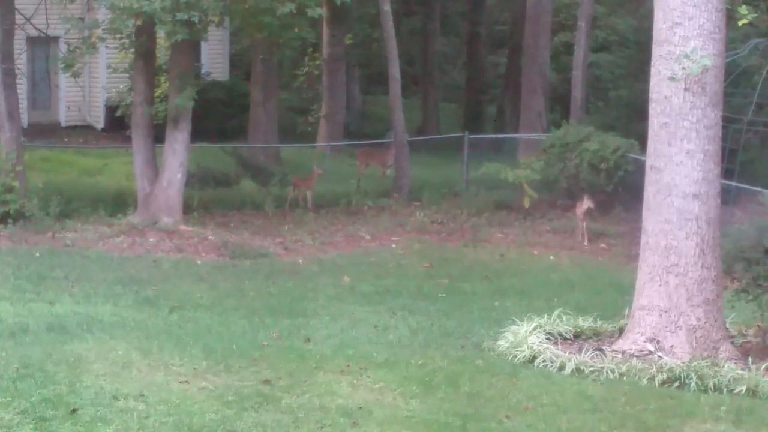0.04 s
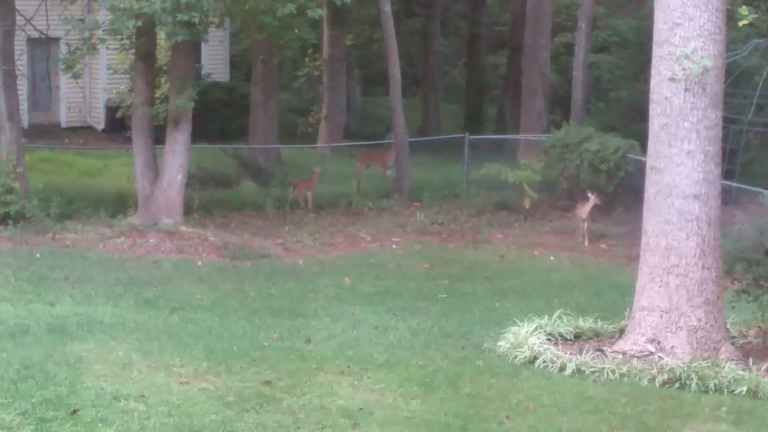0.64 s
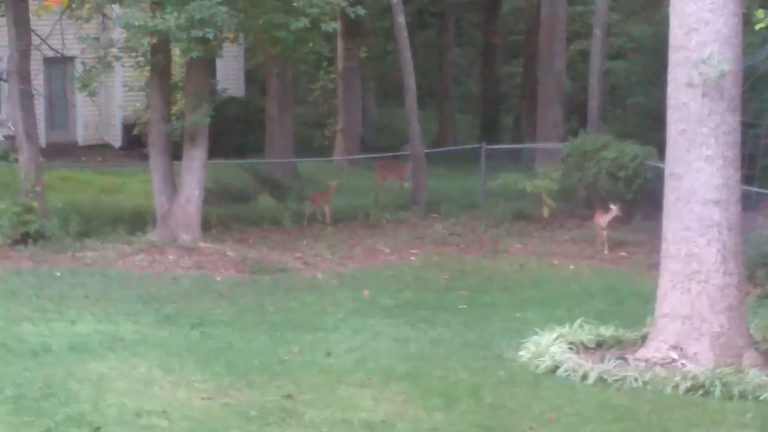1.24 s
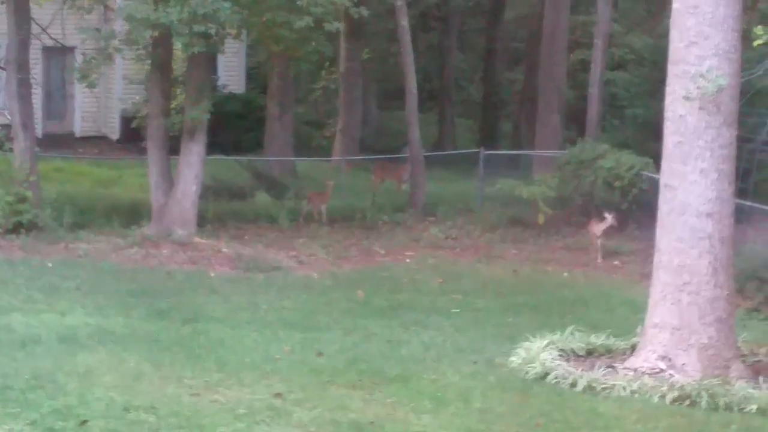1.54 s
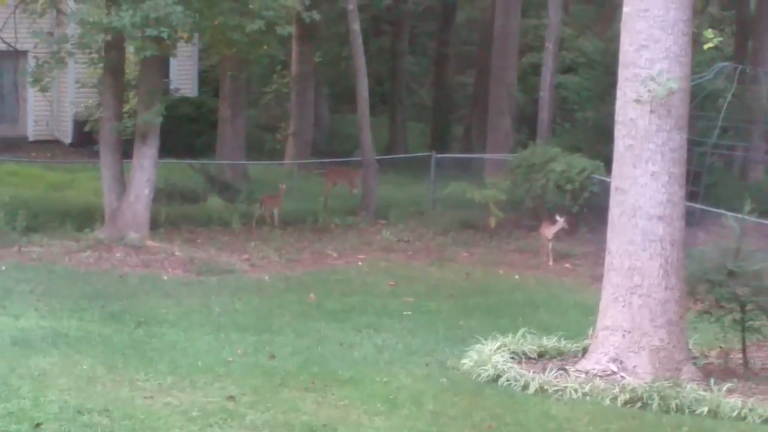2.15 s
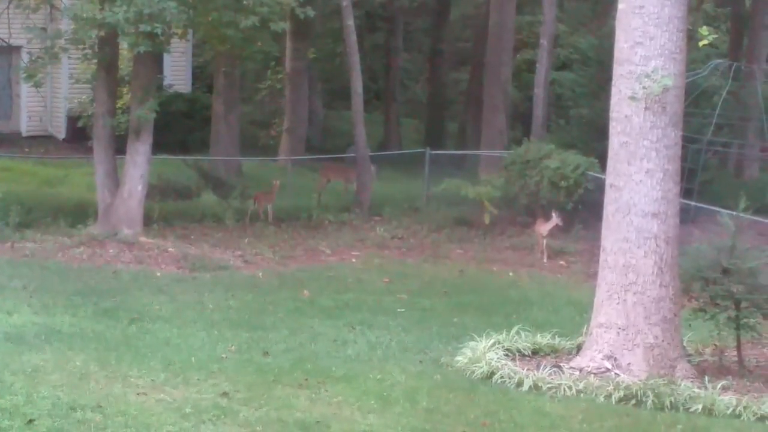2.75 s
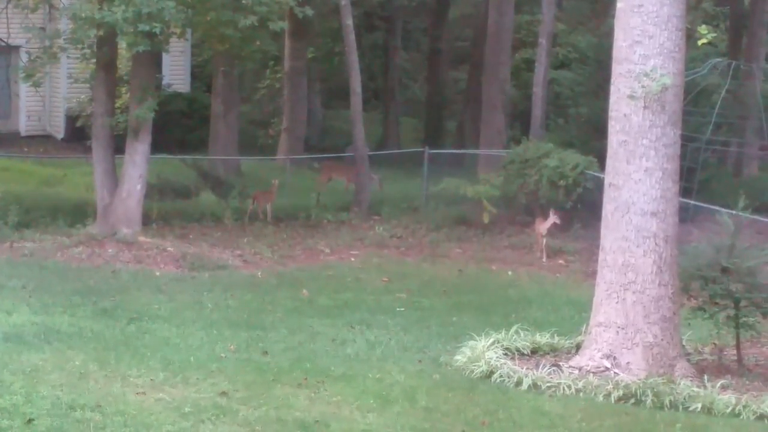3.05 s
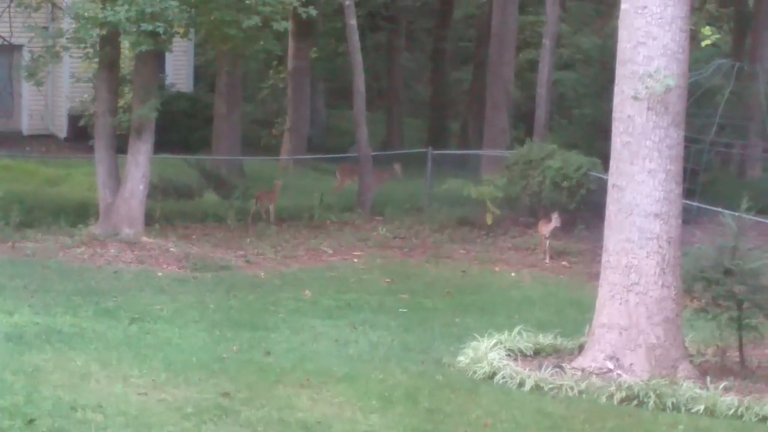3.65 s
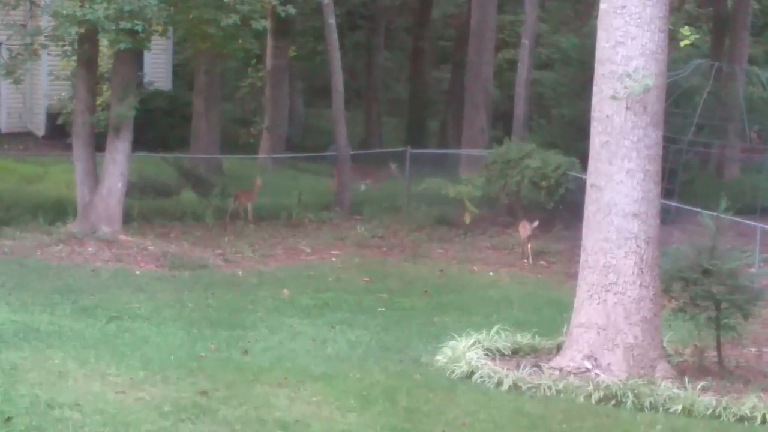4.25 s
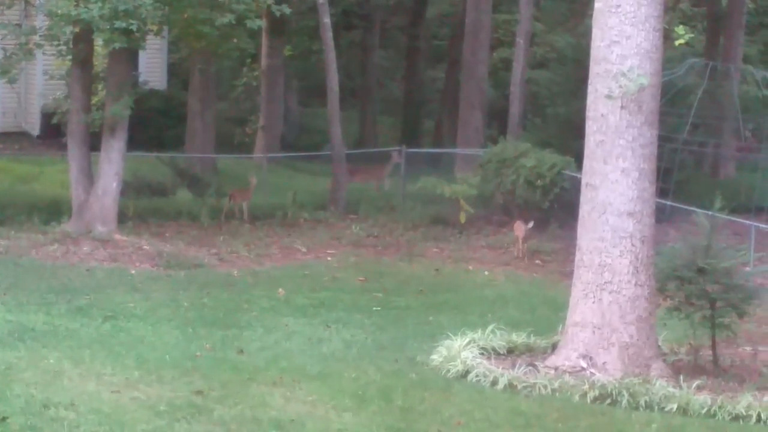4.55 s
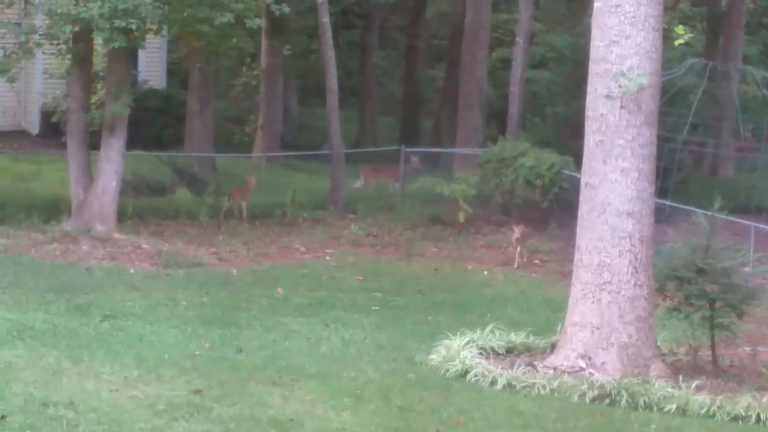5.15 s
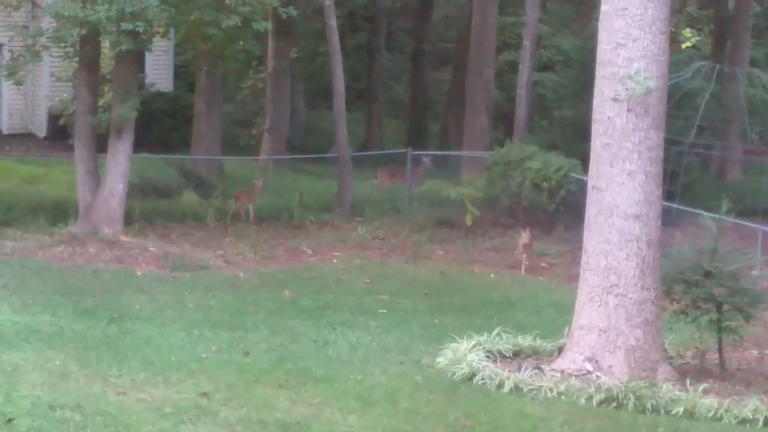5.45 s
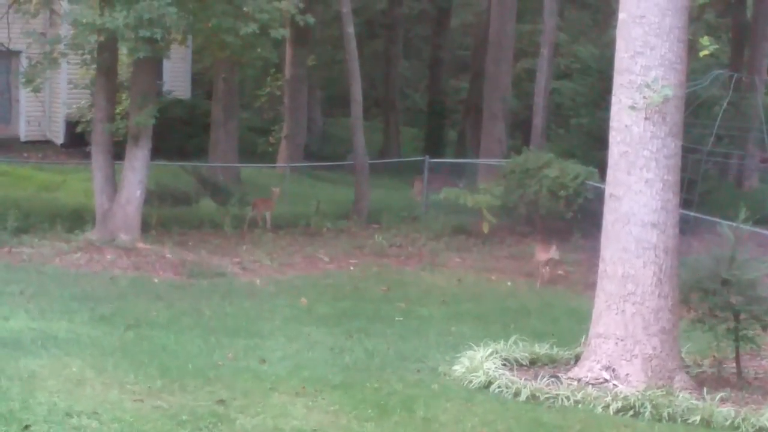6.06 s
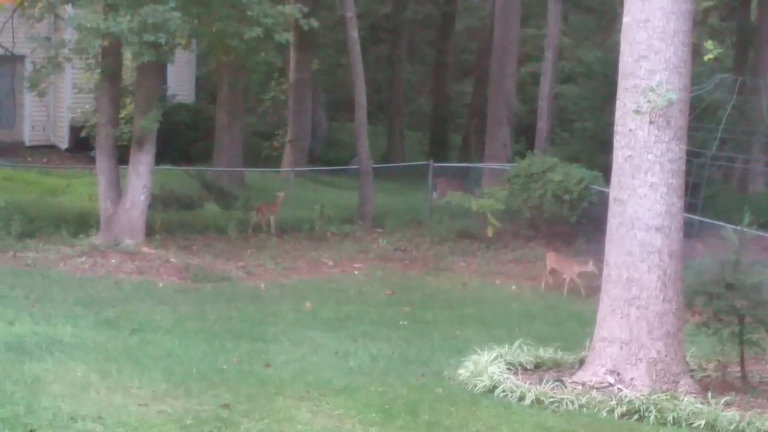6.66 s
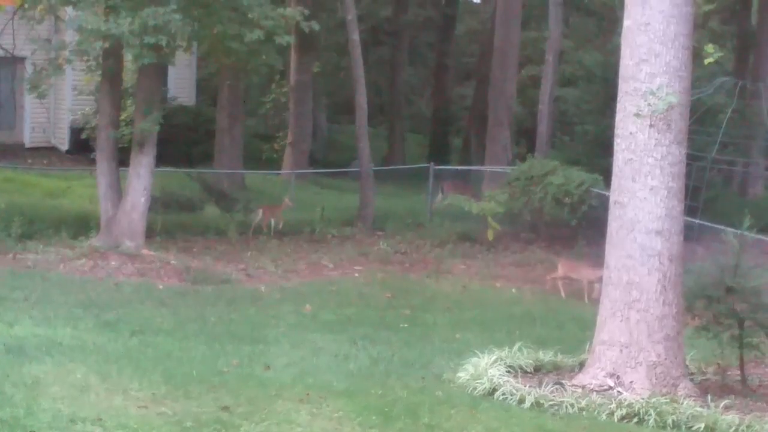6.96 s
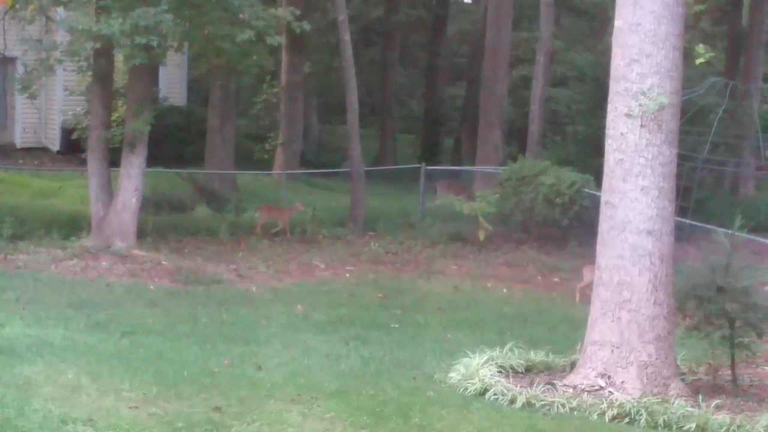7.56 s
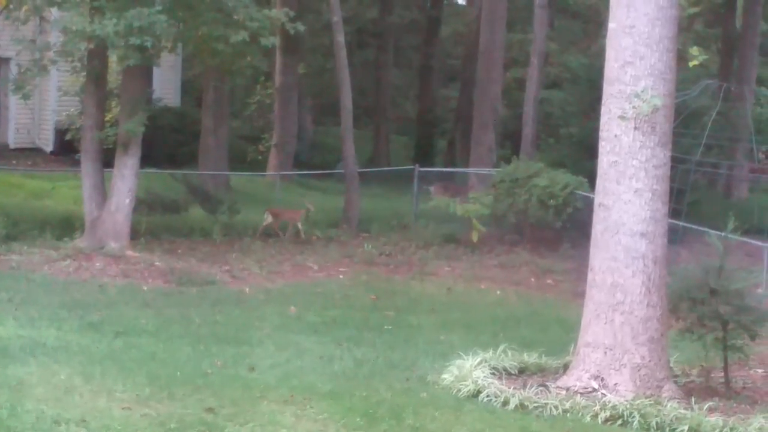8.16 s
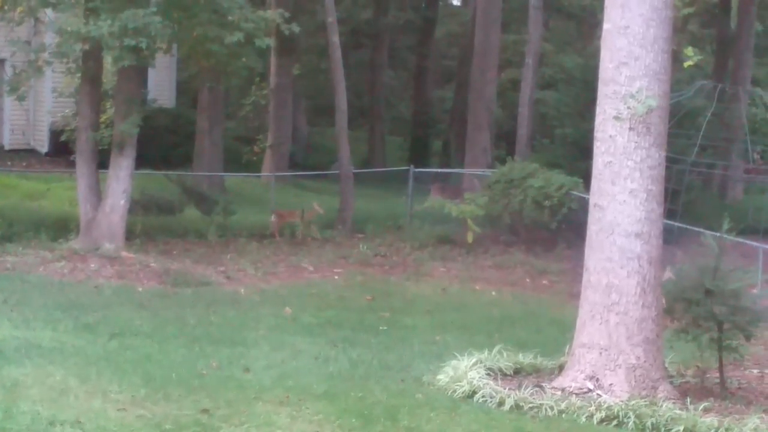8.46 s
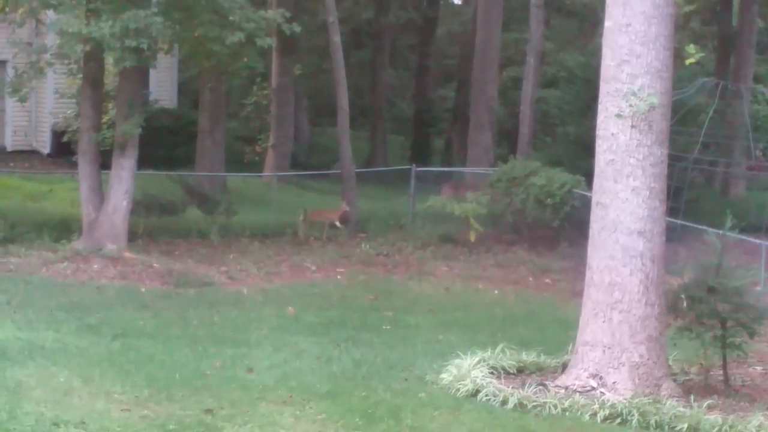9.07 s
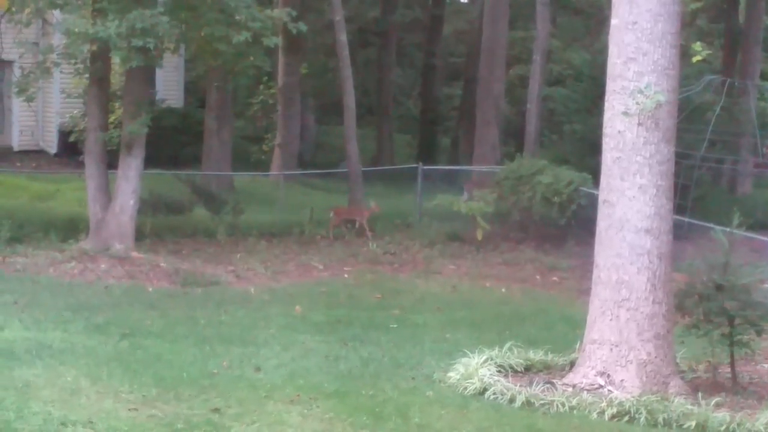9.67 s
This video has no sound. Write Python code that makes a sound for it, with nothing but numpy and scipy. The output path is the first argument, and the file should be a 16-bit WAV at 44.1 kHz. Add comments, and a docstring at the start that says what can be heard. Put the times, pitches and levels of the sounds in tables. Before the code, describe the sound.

A soft low rumble and a thin, high insect chorus fill a backyard beside trees. Brief, piercing bird chirps come unevenly from the right throughout, some close and some faint. Early on, a cluster of dull handling thumps and scuffs hits the left side of the microphone, followed later by two more short bumps. A very faint distant bird whistles twice in the second half or so.

```python
"""A summer lawn at the edge of a wood. It opens on crickets, a far insect chorus and a low rumble that
slowly settles. From half a second on, small birds to the right give sharp rising chips that scatter
among the trunks. Around 1-2 s fingers knock and rub on the camera by its left microphone port; they
return near 3.4 s, at 6.2 s and softly at 9 s. Dry leaves stir at 3.6 s and a distant bird whistles
at 4.2 s; both come once more near 8.3 s."""
import sys
import numpy as np
from scipy import signal
from scipy.io import wavfile

SR = 44100
rng = np.random.default_rng(int(sys.argv[2]) if len(sys.argv) > 2 else 0)


def output_pcm(signal):
    """Save a mono or channel-first signal as 16-bit PCM at the path in sys.argv[1].

    Samples are clipped to [-1, 1] before scaling.
    """
    pcm = np.clip(np.atleast_2d(signal).T, -1, 1) * 32767
    wavfile.write(sys.argv[1], SR, np.round(pcm).astype(np.int16))


N = 433062
TIME = np.arange(N) / SR

# chip cues: t/s, start f/Hz, top f/Hz, level/dB before the distance trim, direct over scatter/dB
CHIP_CUES = [(0.448, 5660, 7400, -34, -13), (0.536, 5000, 6900, -20.5, -3.5), (1.208, 5400, 8540, -37, -5),
             (1.713, 5650, 7460, -46, -2), (1.951, 6100, 7600, -30, -4.5), (1.956, 6950, 9000, -42, 4),
             (2.088, 8000, 8620, -40.5, -7), (2.381, 5480, 7420, -20.5, 0), (2.455, 6730, 7860, -32, -2),
             (2.739, 6400, 8600, -42.5, 3), (2.837, 5900, 7200, -48, -1), (2.953, 5800, 7500, -49.5, -7),
             (3.045, 6300, 8900, -42, -4), (3.19, 6130, 7600, -29, -5), (3.678, 6130, 7380, -38, -21),
             (3.728, 6630, 7900, -40, -2), (4.549, 6440, 8260, -33.5, -8), (4.745, 5270, 7520, -24.5, -6.5),
             (4.820, 5350, 8600, -33.5, 0.5), (5.049, 6300, 8100, -44.5, -4), (5.081, 8150, 8550, -33.5, 6),
             (5.353, 5140, 7420, -35.5, -12), (5.815, 5960, 6370, -43.5, -39),
             (6.964, 5950, 7730, -43.5, -17), (7.464, 5270, 7820, -32.5, -19),
             (7.604, 5400, 7740, -37.5, -17), (7.899, 5820, 7740, -31.5, -7),
             (8.679, 5200, 8400, -33.5, -2), (8.974, 5700, 8700, -36, -6), (9.499, 5440, 7480, -22.5, -2.5)]


def bird_chips(usual_top_hz=7420, usual_length_s=.023, quiver_hz=110, fade_db=6, distance_db=-10):
    """Each chip is a quivering whistle that swells fast and shoots upward, with a weak octave."""
    out, quiver, tremble = np.zeros((2, N)), drift(180), drift(280)
    for s, start_hz, top_hz, level_db, direct_db in CHIP_CUES:
        stretch = (top_hz / usual_top_hz) ** 2.5   # a higher chip is longer and less hooked
        bend = 2.1 / stretch   # 1 is a straight glide
        progress = np.linspace(0, 1, int(usual_length_s * stretch * SR), endpoint=False)
        span = int(s * SR) + np.arange(len(progress))
        glide_hz = top_hz - (top_hz - start_hz) * (1 - progress) ** bend
        phase = phase_of(glide_hz + quiver_hz * quiver[span] * (1 - progress))
        shape = signal.windows.tukey(len(progress), .23) * from_db(.5 * tremble[span] - fade_db * progress)
        swell = from_db(level_db) * rms_one(shape)
        add(out, s, pan(-24) * woods(swell * np.sin(phase), direct_db))
        # the octave is strongest in close chips that start low; the voice grows purer as it rises
        octave_db = -14.5 - .01 * (start_hz - 5330) + .4 * direct_db + 14 * (.22 - progress)
        octave = swell * from_db(octave_db) * np.sin(2 * phase)
        add(out, s, pan(-7.5) * woods(octave, direct_db - 1))
    return from_db(distance_db) * out


# knock cues: t/s, thud level/dB, thud f/Hz, hardness/dB (0 is firm, far below is the soft finger pad)
KNOCK_CUES = [(1.328, -29.5, 110, 5), (1.358, -24, 119, -6), (1.377, -3, 122, -5.5),
              (1.4463, -15, 109, 4.5), (1.4612, -16, 96, -0.5), (1.508, -20, 61, 4.5),
              (1.550, -18.5, 68, 7), (1.620, -27, 85, 2.5), (3.3838, -11, 82, 1.5), (6.2097, -7, 155, 1.5),
              (6.2318, -15, 125, 4.5), (9, -27.5, 90, -10)]
# casing modes: f/Hz, level/dB against the thud, extra dB per dB of thud level
CASING_MODES = [(346, -11.5, 2.7), (513, -10.5, 0.5), (1510, -5, 1.9)]


def finger_knocks(thud_spread=1.81, ring_spread=1.12, crack_db=-17, grit_db=-15, grit_t60=.014):
    """A fingertip pushes air into the port: a damped thud, a gritty crack, a hollow ring of the casing."""
    out, t = np.zeros(N), TIME[:SR // 10]
    click = signal.unit_impulse(len(t))
    for s, thud_db, thud_hz, hard_db in KNOCK_CUES:
        thud = filtered(click, [thud_hz / thud_spread, thud_hz * thud_spread], "band")
        grit = from_db(grit_db - 60 * t / grit_t60) * filtered(rng.standard_normal(len(t)), 740, "high")
        crack = filtered(click + grit, [300, 900], "band", order=1)
        crack = filtered(crack, 2700, "low", order=3)
        layers = [(thud, 0), (crack, hard_db + crack_db)]
        for hz, ring_db, growth in CASING_MODES:
            ring = filtered(click, [hz / ring_spread, hz * ring_spread], "band")
            layers.append((ring, hard_db + ring_db + growth * thud_db))
        for layer, layer_db in layers:
            add(out, s, -from_db(thud_db + layer_db) * layer / abs(layer).max())
    return out


def finger_skids(lead_s=.0054, length_s=.018, grip_limit_db=-32.5):
    """The finger skids as each knock lands, up to a limit set by its grip: extra rub cues."""
    return [(s - lead_s, length_s, min(thud_db + hard_db - 22, grip_limit_db), 360, -26.5)
            for s, thud_db, _, hard_db in KNOCK_CUES]


# rub cues: t/s, length/s, level/dB, roll-off f/Hz, hiss/dB against the level
RUB_CUES = [(0.983, 0.069, -41.5, 338, -16.5), (1.036, 0.048, -48, 600, -20),
            (1.482, 0.025, -41, 1200, -28), (1.505, 0.033, -32, 247, -46), (1.867, 0.031, -42.5, 140, -32),
            (3.535, 0.039, -41, 326, -29), (3.666, 0.066, -54, 2500, -19)]


def finger_rubs(grain_db=4.5, skin_hz=1900, hiss_hz=7100):
    """Skin slips over the casing in uneven grains: a dull scuff with a thin hiss."""
    out = np.zeros(N)
    slips = rng.standard_normal(N) * from_db(grain_db * drift(110))
    for s, length, level_db, corner_hz, hiss_db in RUB_CUES + finger_skids():
        size = int(length * SR)
        stroke = rms_one(slips[int(s * SR):][:size] * signal.windows.tukey(size, .5))
        stroke = np.pad(stroke, (0, SR // 20))
        scuff = filtered(stroke, corner_hz, "low", order=1)
        scuff = filtered(scuff, skin_hz, "low", order=1)
        scuff = filtered(scuff, 3300, "low", order=4)
        scuff = filtered(scuff, 42, "high")
        scuff /= np.sqrt(np.sum(scuff ** 2) / size)
        hiss = from_db(hiss_db) * filtered(stroke, hiss_hz, "high")
        add(out, s, from_db(level_db) * (scuff + hiss))
    return out


# tick cues: t/s, burst level/dB before filtering
TICK_CUES = [(1.333, -42.5), (3.417, -33.5)]


def casing_ticks(t60=.0073, snap_hz=6100, snap_db=8):
    """The plastic casing gives tiny bright ticks with one snapping resonance."""
    bursts, t = np.zeros(N), TIME[:SR // 20]
    for s, level_db in TICK_CUES:
        add(bursts, s, from_db(level_db - 60 * t / t60) * rng.standard_normal(len(t)))
    snap = filtered(bursts, [snap_hz - 300, snap_hz + 300], "band", order=1)
    return filtered(bursts, [4400, 8500], "band", order=1) + from_db(snap_db) * snap


# cricket voices: first pulse t/s, pulse rate/Hz, f/Hz, sag per cycle/Hz, start level/dB, end level/dB
CRICKET_VOICES = [(.025, 9.434, 4945, 600, -66, -58), (.04, 9.6, 5460, 300, -64, -64),
                  (.07, 11.2, 5860, 120, -69, -66)]


def crickets(waver_hz=30, flutter_db=1, rasp_db=2.5, sharpness=15):
    """Every wing closure is one slightly raspy tone pulse that sags in pitch."""
    out = np.zeros(N)
    for first_s, per_s, hz, sag_hz, start_db, end_db in CRICKET_VOICES:
        stroke = ((TIME - first_s) * per_s + .5) % 1 - .5
        pulses = np.abs(np.cos(np.pi * stroke)) ** sharpness
        pitch = hz - sag_hz * stroke + waver_hz * drift(94.5)
        level_db = np.linspace(start_db, end_db, N) + flutter_db * drift(2.9) + rasp_db * drift(150)
        out += from_db(level_db) * pulses * np.sin(phase_of(pitch))
    return pan(-21) * woods(out, direct_db=0)[:, :N]


# whistle cues: t/s, length/s, level/dB
WHISTLE_CUES = [(4.17, .26, -60.5), (8.33, .42, -65.5)]
# their contour, a slow sag and then a drop: share of the length, f/Hz, level/dB against the cue
WHISTLE_CONTOUR = [(0, 2620, -12), (.28, 2616, 0), (.5, 2524, -7), (.76, 2480, -6), (.84, 2160, -4),
                   (1, 2060, -8)]


def far_whistles(waver_hz=32):
    """A distant bird slurs long falling notes that arrive mostly as scatter."""
    out = np.zeros(N)
    share, hz, contour_db = np.transpose(WHISTLE_CONTOUR)
    for s, length, level_db in WHISTLE_CUES:
        progress = (TIME - s) / length
        swell = np.interp(progress, share, from_db(level_db + contour_db), left=0, right=0)
        pitch = np.interp(progress, share, hz) + waver_hz * drift(65)
        out += swell * np.sin(phase_of(pitch))
    return woods(out, direct_db=-6)[:, :N]


# rustle cues: t/s, length/s, level/dB
RUSTLE_CUES = [(3.58, .26, -66), (8.28, .14, -64)]


def leaf_rustles(band_hz=(2500, 6500)):
    """Dry leaves stir in the wood in faint hissy swells."""
    swell = sum(np.interp(TIME, [s, s + length / 4, s + length], [0, from_db(db), 0])
                for s, length, db in RUSTLE_CUES)
    return pan(2.5) * swell * rms_one(filtered(rng.standard_normal((2, N)), band_hz, "band"))


# insect bed: centre f/Hz, width/Hz, level/dB, left over right/dB
INSECT_BANDS = [(3600, 460, -71.5, -9), (4984, 260, -76, -13), (5345, 490, -66, -40), (5790, 330, -77, -36),
                (2650, 54, -95, 3)]


def insect_chorus(throb_db=1.1):
    """Countless far insects merge into a throbbing band for each species."""
    out = np.zeros((2, N))
    for hz, width_hz, level_db, pan_db in INSECT_BANDS:
        band = filtered(rng.standard_normal((2, N)), [hz - width_hz / 2, hz + width_hz / 2], "band")
        out += pan(pan_db) * rms_one(band) * from_db(level_db + throb_db * drift(27))
    return out


# tone of the air bed: f/Hz, relative level/dB
AIR_EQ = [(25, -13), (45, -3), (70, 3), (115, -2), (180, 1.5), (280, -5), (420, -9.5), (850, -9.5),
          (1150, -16.5), (1450, -20), (1850, -31), (3000, -31.5), (4400, -37.5), (9000, -41), (15000, -38)]
# its stereo width: f/Hz, left-right correlation (1 is mono)
AIR_CORRELATION = [(60, 1), (99, 0.74), (160, 1.03), (270, 0.8), (450, 0.84), (740, 0.24), (1220, -0.58),
                   (2010, 0.27), (3330, 0.0), (5500, -0.4), (9080, -0.05), (15000, 0.03)]
# its balance: f/Hz, left over right/dB
AIR_BALANCE = [(90, 3), (300, 1.5), (750, -2), (1400, -5), (2100, 5.5), (5000, -11.5), (9000, 3)]


def outdoor_air(start_db=-48, settled_db=-50, settle_s=3.3, wander_db=1):
    """Rumble and hiss in wandering half-octave bands, near mono in the bass, easing as it settles."""
    out, edges = 0, 21 * 2 ** np.arange(0, 10.1, .5)
    white = rng.standard_normal((2, 2, N))
    for k, (low, high) in enumerate(zip(edges, edges[1:])):
        mid, side = filtered(white[k % 2], [low, high], "band", order=3)
        hz = np.sqrt(low * high)
        alike = np.clip(at_hz(AIR_CORRELATION, hz), -1, 1)
        band = np.sqrt(1 + alike) * mid + np.sqrt(1 - alike) * side * [[1], [-1]]
        gain = from_db(at_hz(AIR_EQ, hz) + wander_db * drift(4.1))
        out = out + pan(at_hz(AIR_BALANCE, hz)) * gain * band
    return rms_one(out) * from_db(settled_db + (start_db - settled_db) * np.exp(-TIME / settle_s))


def woods(x, direct_db, leaf_t60=.032, trunk_t60=.18, tail_t60=.86, build_s=.0048):
    """Woodland reverb at equal energy: direct path, scatter off leaves, then trunks, and a long tail."""
    t = TIME[:SR]
    early = from_db(3.5 - 60 * t / leaf_t60) + from_db(-60 * t / trunk_t60)
    tail = from_db(-19 - .9 * direct_db - 60 * t / tail_t60)   # grows with distance
    clumps = from_db(2 * drift(60)[:SR])
    envelope = (early + tail) * clumps * (1 - np.exp(-t / build_s))
    paths = rms_one(rng.standard_normal((2, len(t))) * envelope) / np.sqrt(len(t))
    paths[:, 0] += from_db(direct_db)
    heard = signal.fftconvolve(x[None], paths, axes=1)
    return heard * np.sqrt(np.sum(x ** 2) / np.sum(heard ** 2, axis=1, keepdims=True))


def drift(rate_hz):
    """Smooth random modulation of rms about 1."""
    pole = np.exp(-200 * np.pi * rate_hz / SR)
    steps = rng.standard_normal(N // 100 + 1002)   # one per 100 samples
    slow = signal.lfilter([1], [1, -2 * pole, pole * pole], steps)[1000:]
    return np.interp(np.arange(N) / 100, np.arange(len(slow)), rms_one(slow))


def phase_of(hz):
    """Running phase of a moving pitch."""
    return 2 * np.pi * np.cumsum(hz) / SR


def from_db(db):
    """Decibels to gain."""
    return 10 ** (np.asarray(db) / 20)


def rms_one(x):
    """Scale to rms 1."""
    return x / np.sqrt(np.mean(x ** 2) + 1e-20)


def at_hz(points, hz):
    """Read a curve on a log-frequency axis."""
    points_hz, values = np.transpose(points)
    return np.interp(np.log(hz), np.log(points_hz), values)


def filtered(x, hz, kind, order=2):
    """Causal Butterworth filter."""
    sos = signal.butter(order, np.clip(hz, 10, .45 * SR), kind, fs=SR, output="sos")
    return signal.sosfilt(sos, x + 1e-18)


def pan(db):
    """Left and right gains, db apart, of mean power 1; negative leans right."""
    return rms_one(from_db([[db / 2], [-db / 2]]))


def add(out, s, sound):
    """Mix a sound in at time s."""
    start = max(round(s * SR), 0)
    part = out[..., start:start + sound.shape[-1]]
    part += sound[..., :part.shape[-1]]


def scene():
    """The garden, with knocks and rubs hard left and casing ticks near the centre."""
    garden = bird_chips() + far_whistles() + crickets() + insect_chorus() + leaf_rustles() + outdoor_air()
    fingers = (finger_knocks() + finger_rubs()) * from_db([[0], [-34]])
    return garden + fingers + casing_ticks() * pan(1)


def record(dry):
    """A steep high cut at 15.8 kHz on the whole mix."""
    return signal.sosfilt(signal.ellip(10, .1, 80, 15800, fs=SR, output="sos"), dry)


dry = scene()
out = record(dry)
output_pcm(out)
```